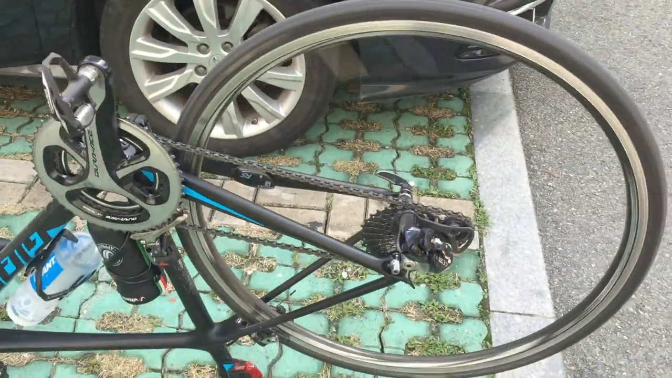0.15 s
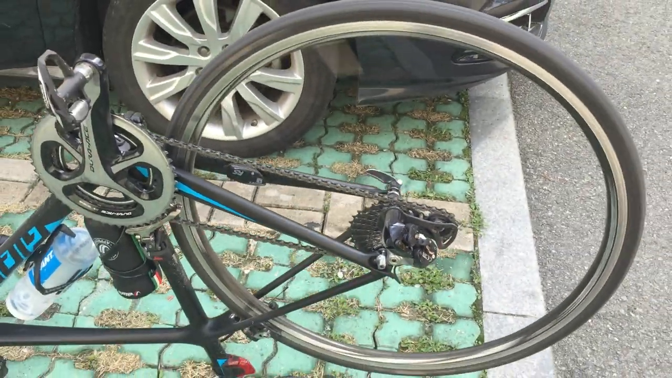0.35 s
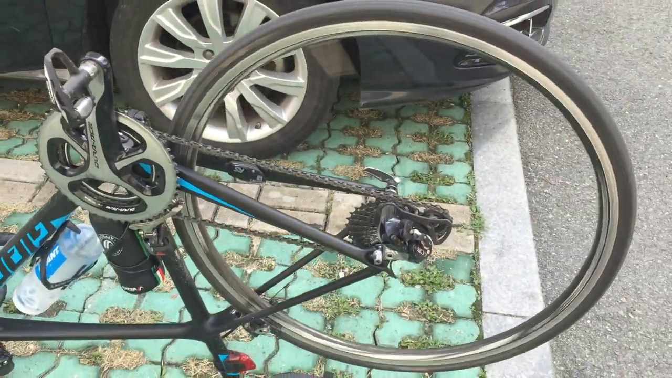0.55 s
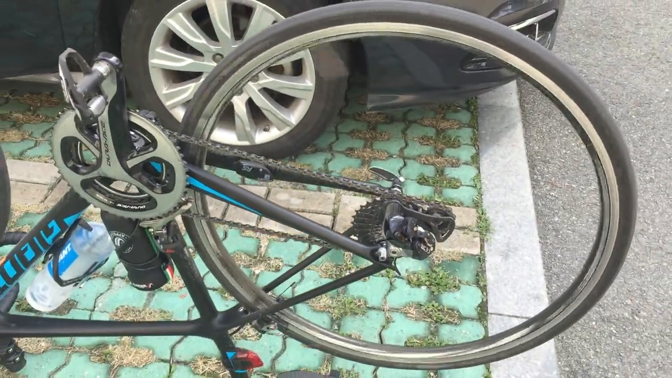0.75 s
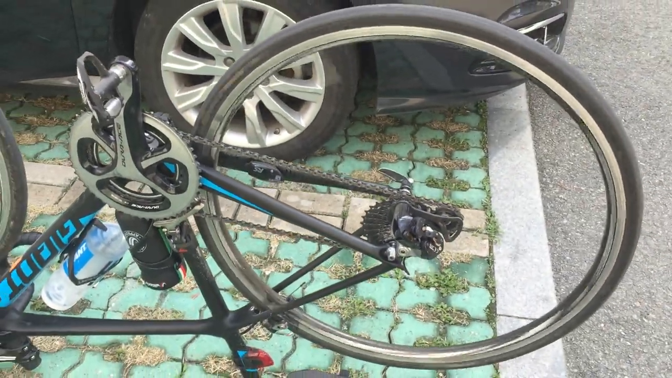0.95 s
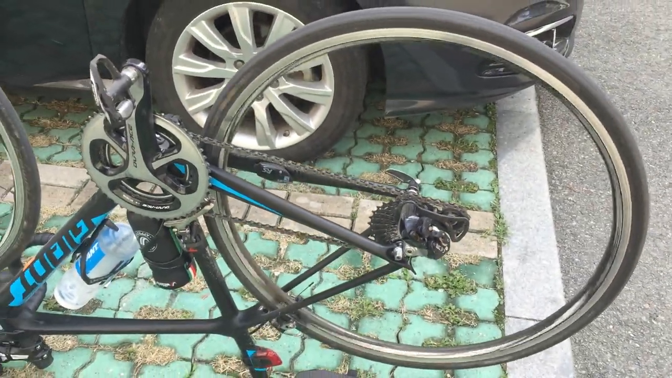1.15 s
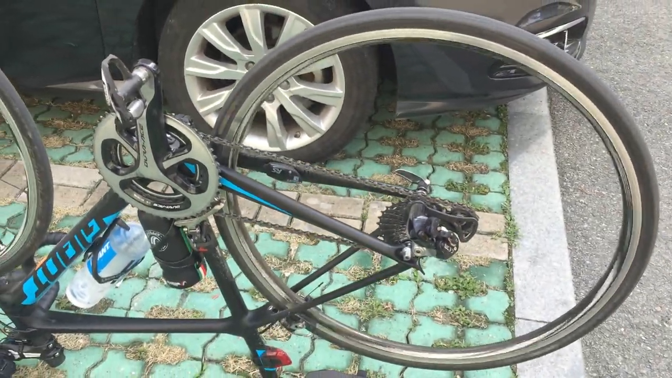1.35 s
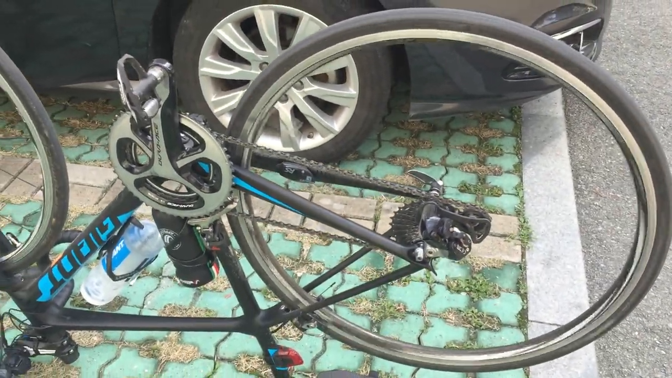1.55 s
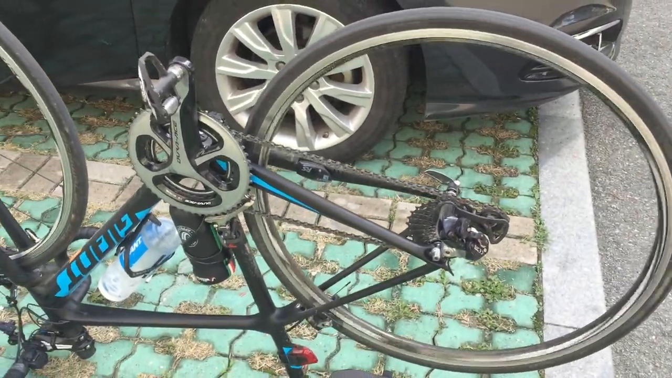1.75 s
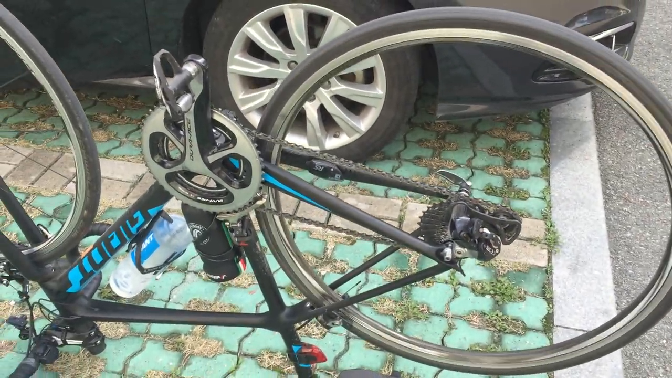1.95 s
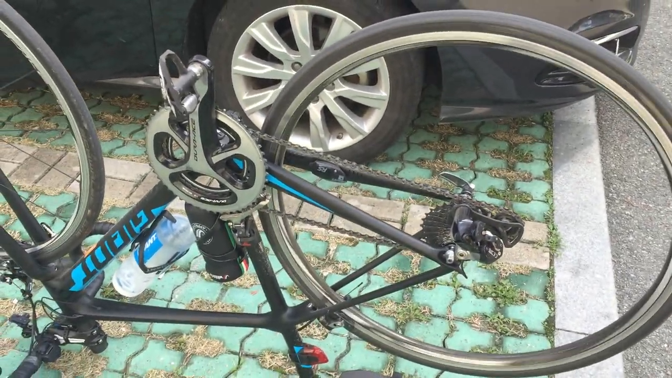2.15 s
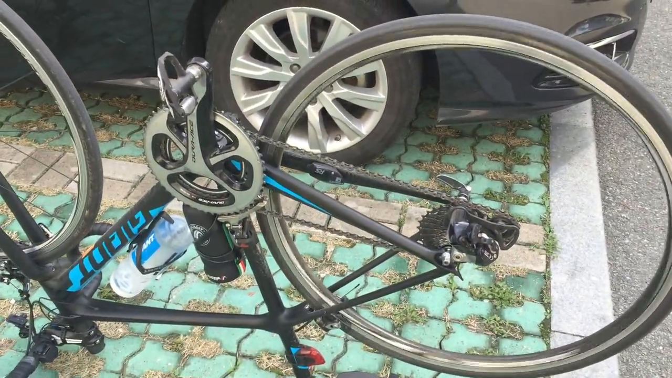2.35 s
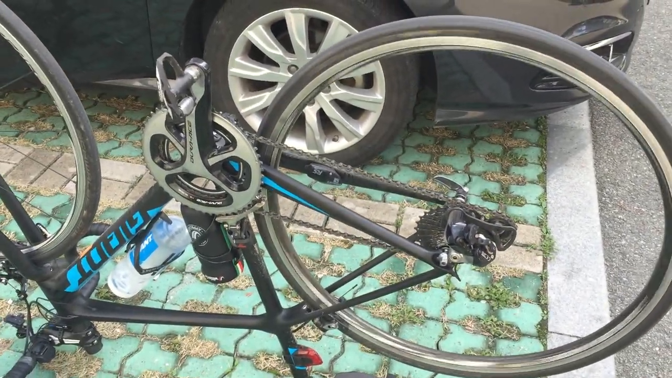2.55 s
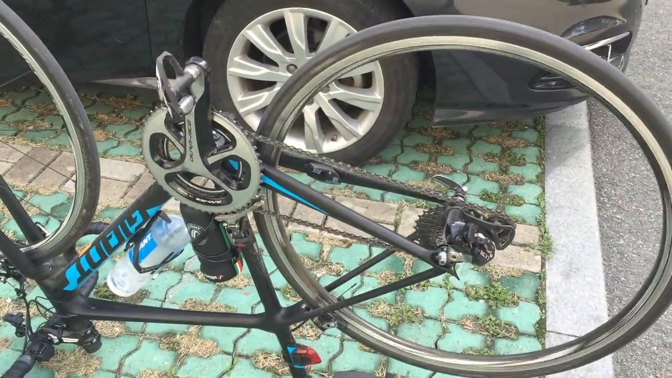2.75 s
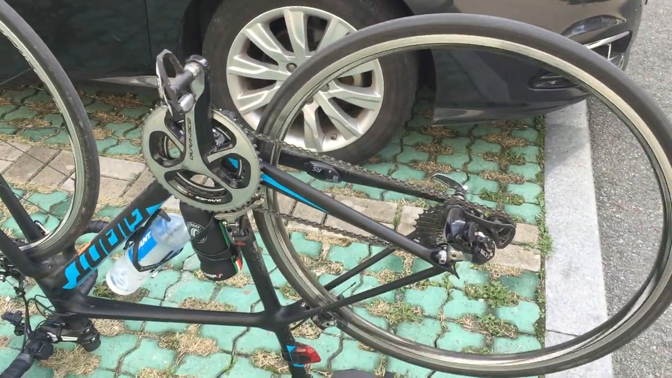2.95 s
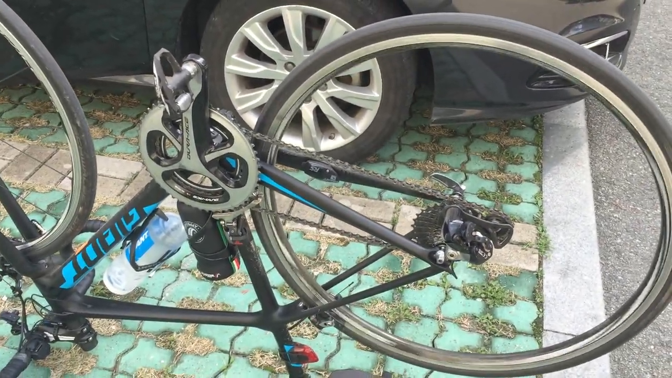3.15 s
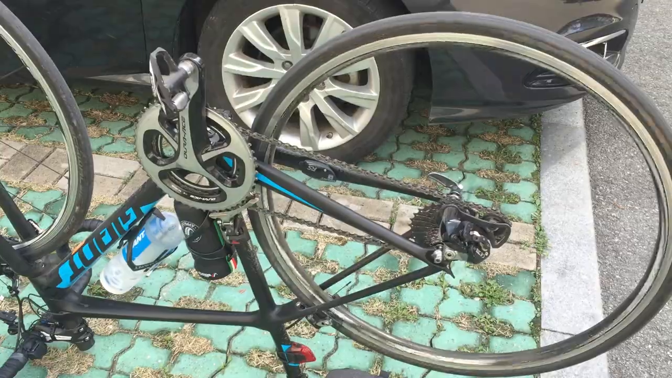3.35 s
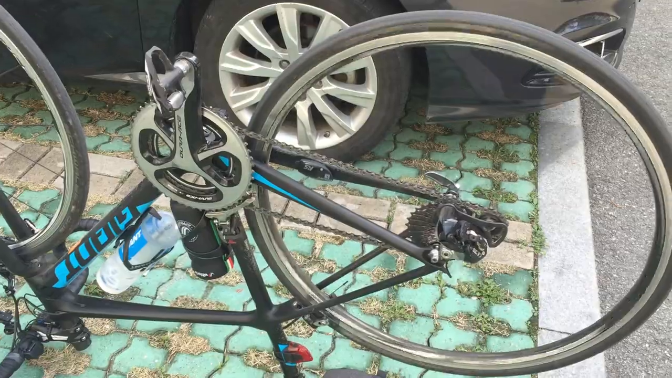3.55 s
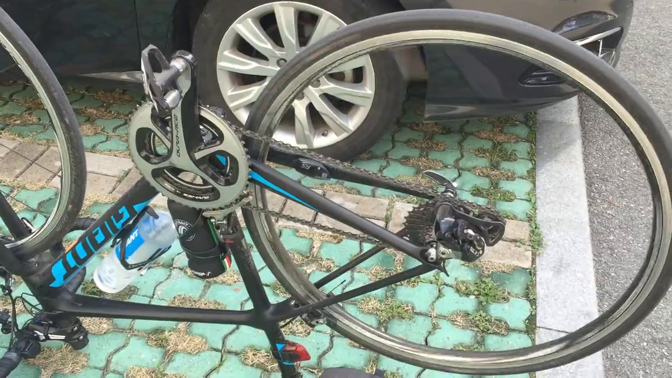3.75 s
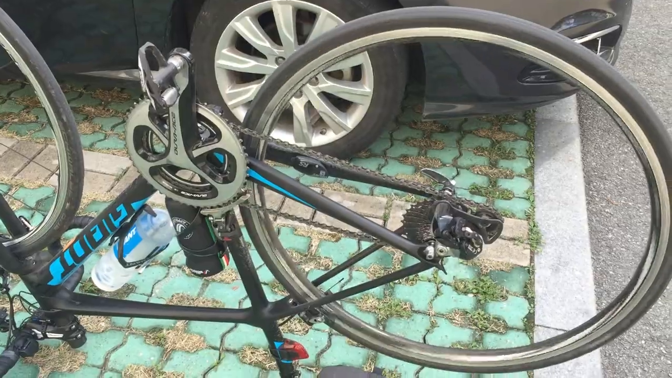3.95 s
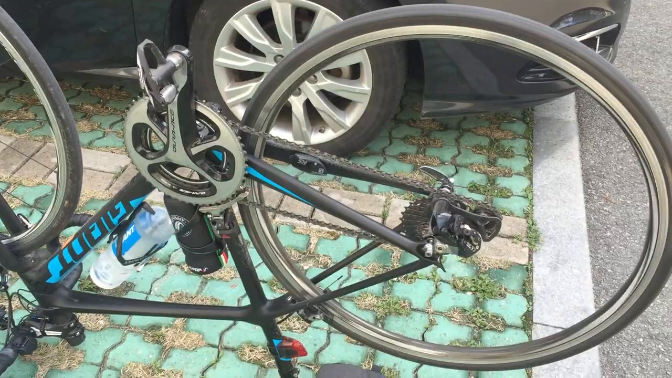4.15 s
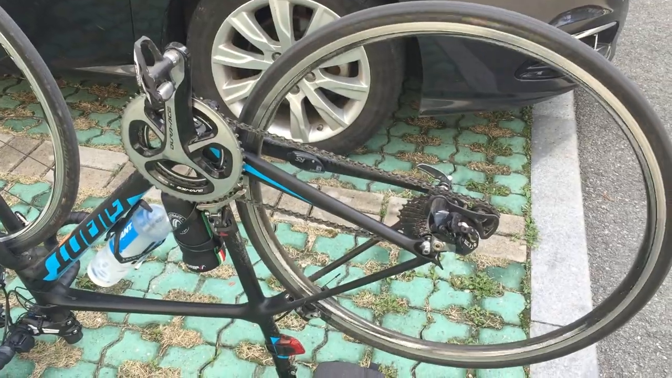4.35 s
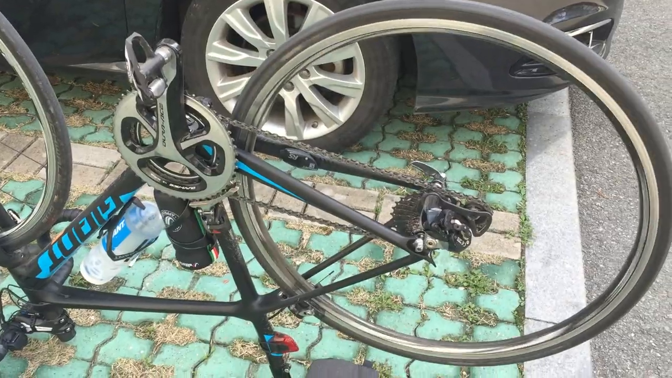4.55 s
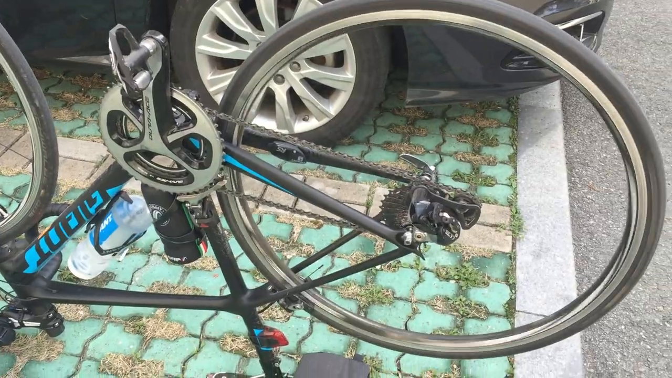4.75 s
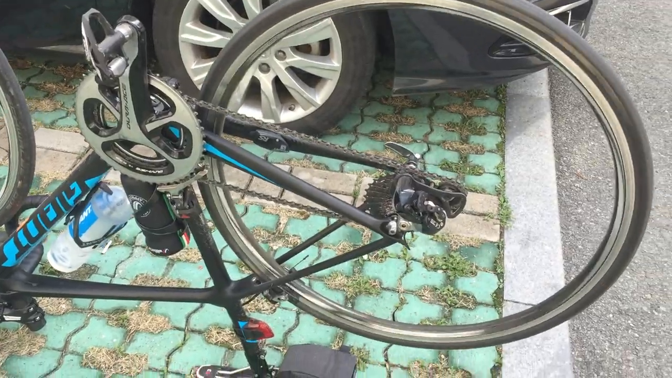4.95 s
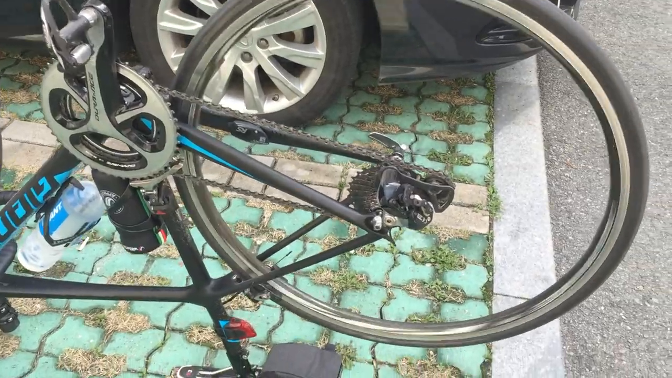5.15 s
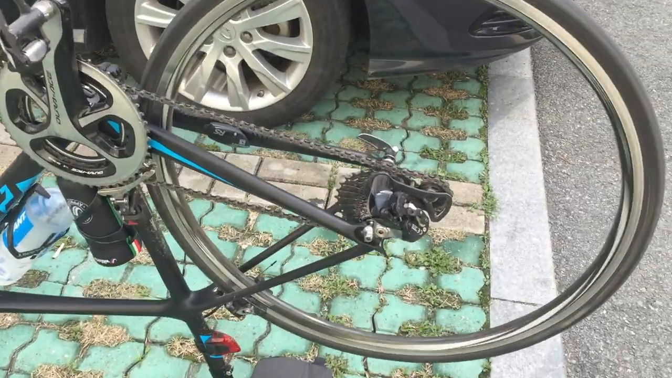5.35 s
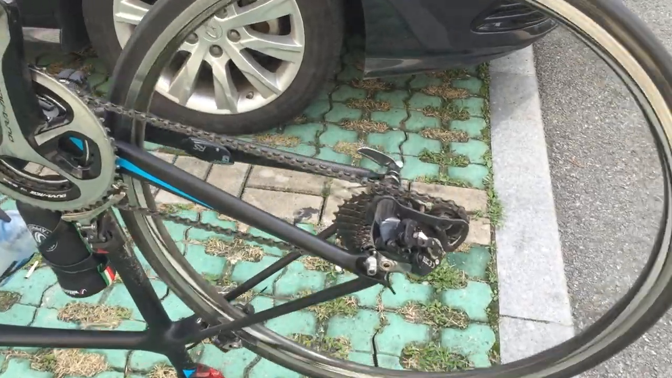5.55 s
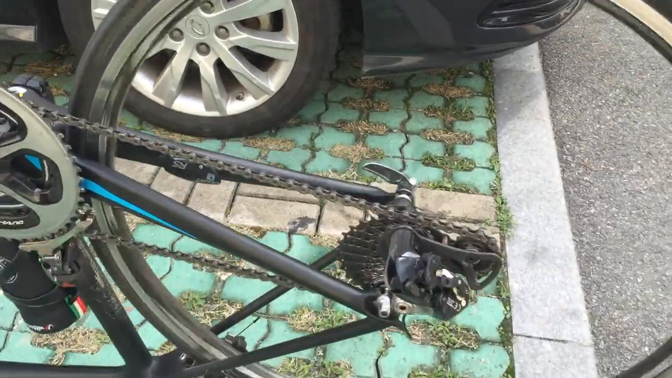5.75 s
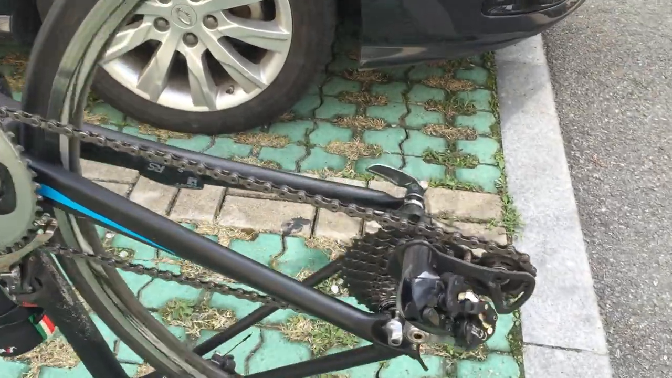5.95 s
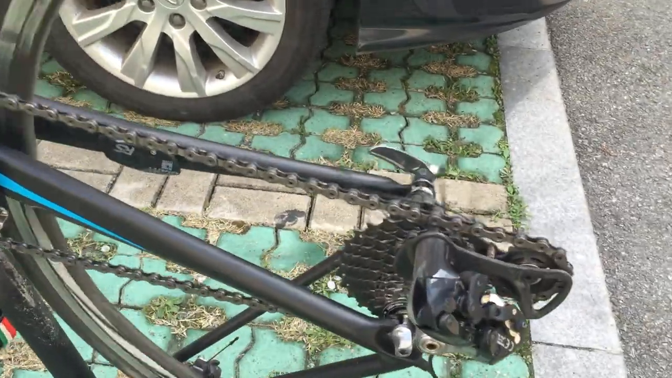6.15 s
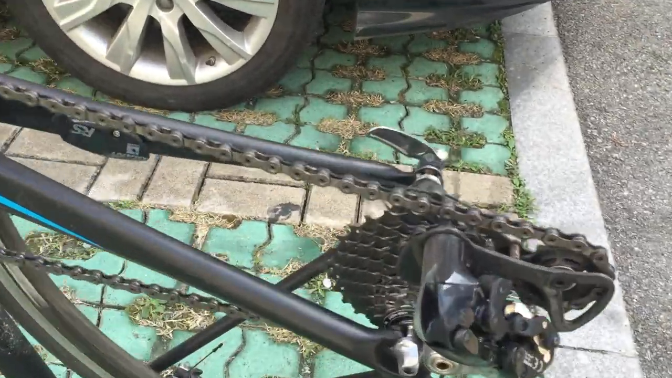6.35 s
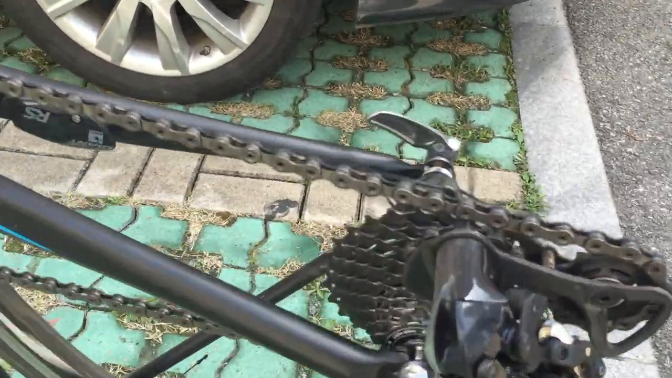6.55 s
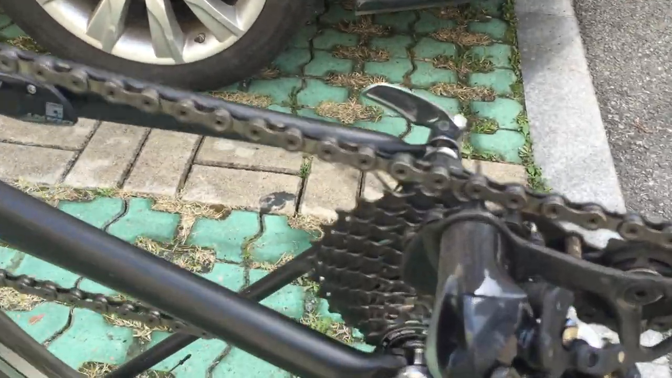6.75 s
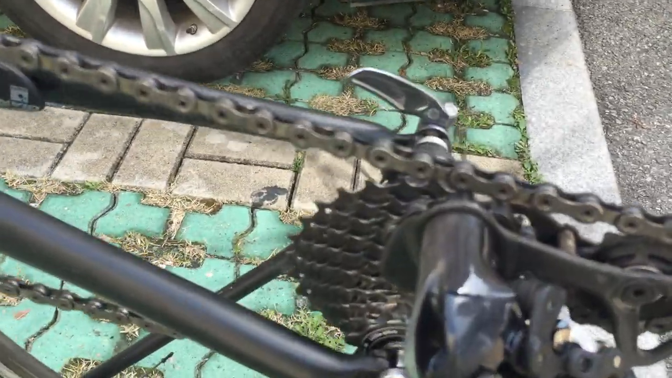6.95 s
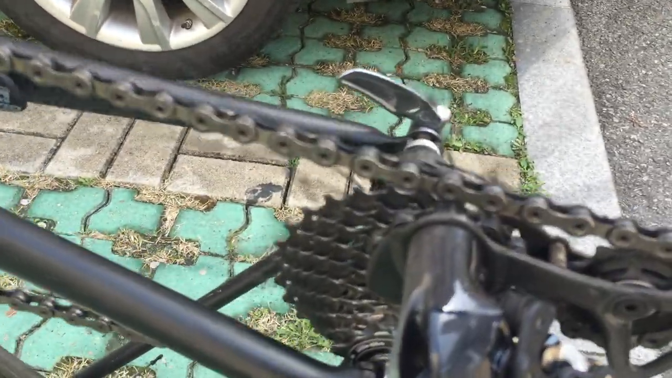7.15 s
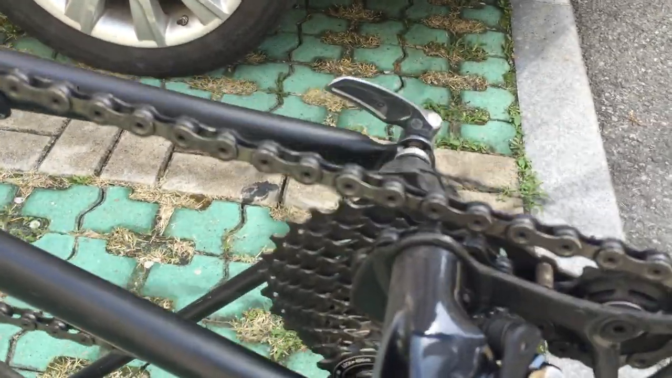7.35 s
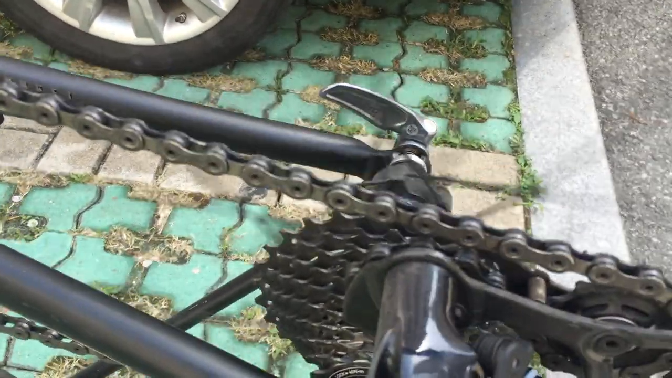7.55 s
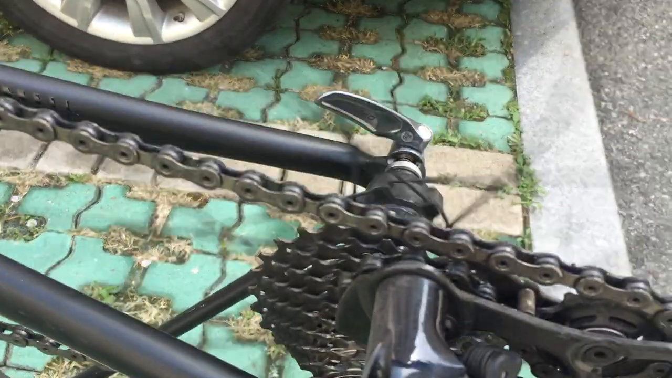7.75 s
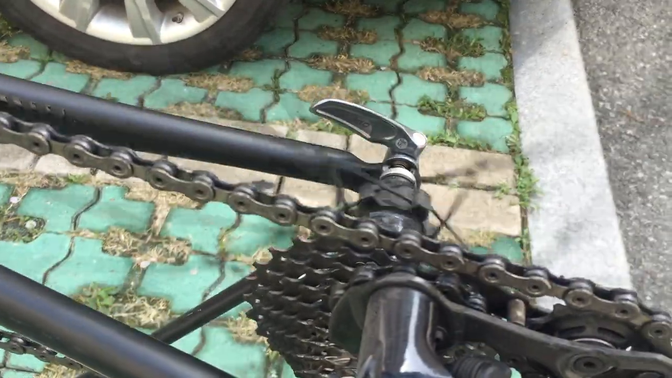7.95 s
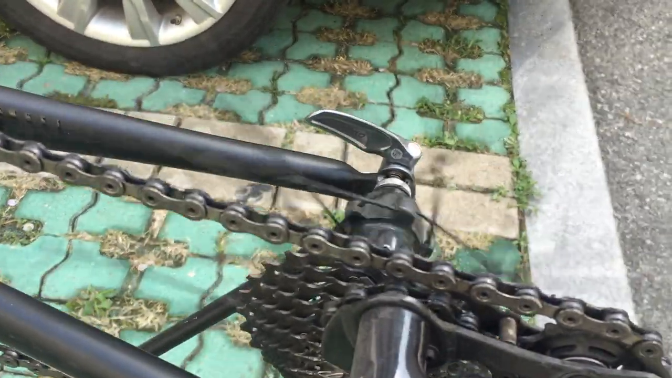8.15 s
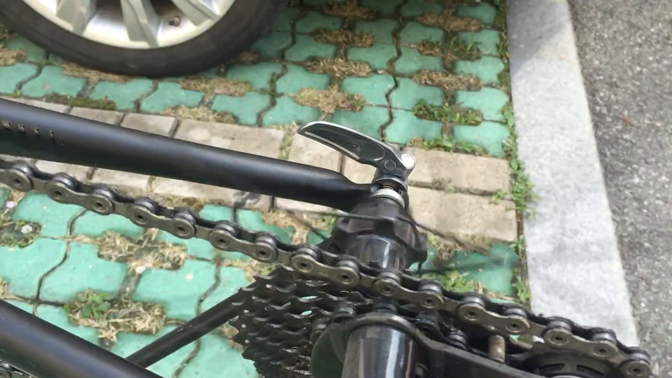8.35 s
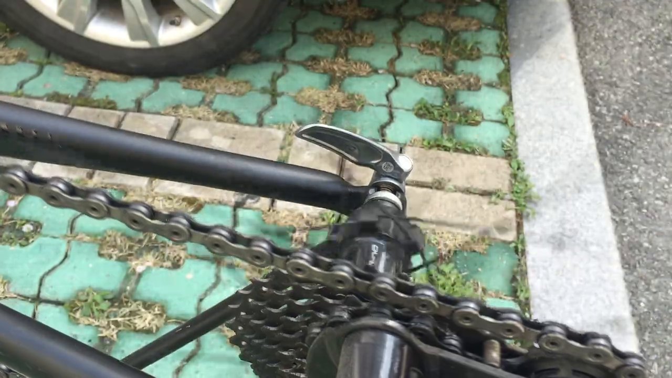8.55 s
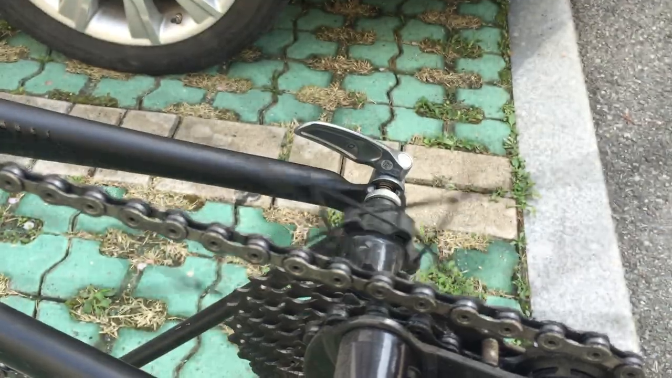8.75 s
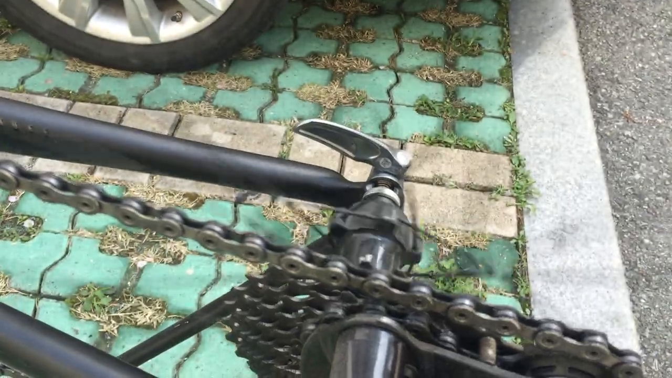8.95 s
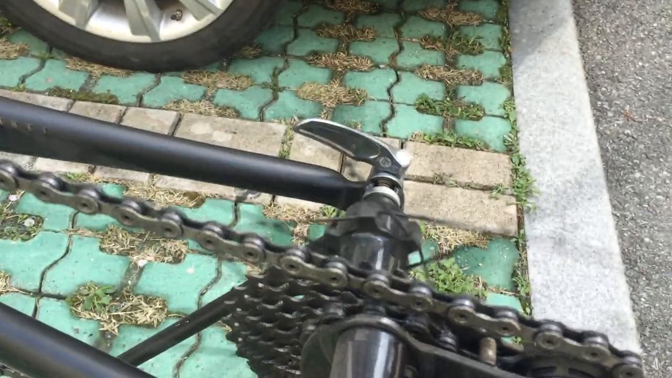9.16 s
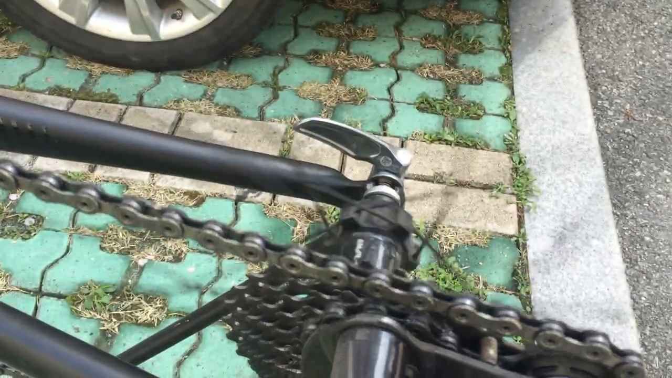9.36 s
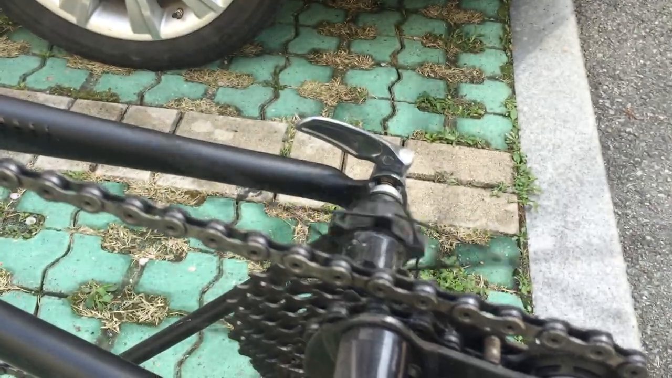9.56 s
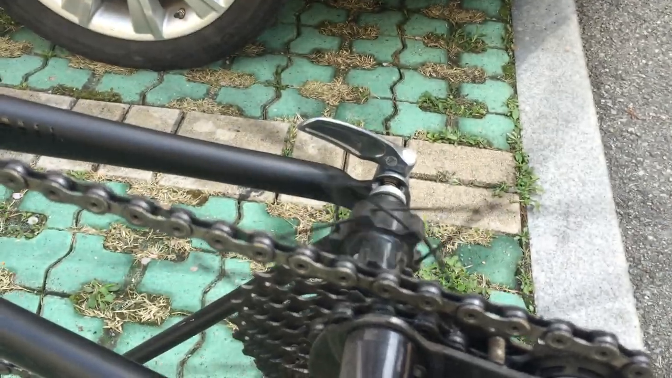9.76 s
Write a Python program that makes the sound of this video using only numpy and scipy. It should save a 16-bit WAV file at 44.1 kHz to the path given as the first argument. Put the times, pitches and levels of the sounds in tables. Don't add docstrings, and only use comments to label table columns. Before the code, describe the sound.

Fast, thin metallic ticking from a freewheeling bicycle hub, around ninety clicks a second and slowly dropping, with a faint hollow rim resonance pulsing as the wheel turns. Distant tyre hiss fades beneath. Around six seconds the hand-held microphone approaches, with rumbling wind bumps and handling knocks, and the ticks turn loud, dry and sharply bright until the end. Open outdoor parking area.

```python
import sys
import numpy as np
from scipy import signal
from scipy.fft import rfft, irfft, next_fast_len
from scipy.io import wavfile
from scipy.ndimage import uniform_filter1d, map_coordinates

SR = 44100
rng = np.random.default_rng(int(sys.argv[2]) if len(sys.argv) > 2 else 0)


def to_linear_factor(level_db):
    exponent = np.asarray(level_db, float) / 20
    return 10 ** exponent


def transcribe(u):
    v = np.clip(np.atleast_2d(u).T, -1, 1)
    q = np.round(v * 32767).astype(np.int16)
    wavfile.write(sys.argv[1], SR, q)


N = 436149
TEETH = 18


def unit(x):
    return x / np.sqrt(np.mean(x ** 2) + 1e-20)


def along(points, hz):
    f, v = np.transpose(points)
    return np.interp(np.log(hz + 1), np.log(f + 1), v)


def track(rows):
    s, value = np.transpose(rows)
    return np.interp(np.arange(N) / SR, s, value)


def wobble(knots_per_s):
    knots = rng.standard_normal(int(N * knots_per_s / SR) + 4)
    return map_coordinates(knots, [np.arange(N) * knots_per_s / SR])


def filtered(x, response):
    n = x.shape[-1]
    m = 2 * next_fast_len(n // 2 + 4096)
    spectrum = rfft(x, m) * response(np.fft.rfftfreq(m, 1 / SR))
    return unit(irfft(spectrum, m)[..., :n])


def colour(points):
    return lambda hz: to_linear_factor(along(points, hz))


def ringing(peaks):
    return lambda f: sum(to_linear_factor(db) ** 2 / (1 + (2 * (f - c) / w) ** 2) for c, w, db in peaks)


def causal(power):
    def response(hz):
        cepstrum = irfft(np.log(power(hz) + 1e-9) / 2)
        cepstrum[1:len(hz) - 1] *= 2
        cepstrum[len(hz):] = 0
        return np.exp(rfft(cepstrum))
    return response


def hollow(hz, centre_hz, width_hz):
    return 1 - .88 / (1 + (2 * (hz - centre_hz) / width_hz) ** 2)


# time in seconds, closeness 0-1.
CLOSENESS = [(0, 0.08), (5.2, 0), (6.0, 0.32), (6.8, 0.72), (9.89, 0.89)]


def closeness():
    return track(CLOSENESS)


# frequency in Hz, level in dB per Hz.
HISS_SPECTRUM = [(300, -42), (500, -24.5), (900, 2.5), (1300, 4.5), (1800, 1), (2700, 1), (5000, -3),
                 (15500, -47)]
# frequency in Hz, level in dB per Hz.
DRONE_SPECTRUM = [(150, -41), (240, -22), (310, -3.5), (390, -0.5), (470, -1), (700, -10)]


def street():
    t, near = np.arange(N) / SR, closeness()
    hiss_start_db, draws_away_s = -49.5, 5.2
    close_gain_db = 0.5
    distance_db = -20 * np.log10(1 + t / draws_away_s) ** 0.87
    hiss_db = hiss_start_db + distance_db + close_gain_db * near + wobble(3.02)
    air = rng.standard_normal((2, N))
    afar = filtered(air[0], lambda hz: colour(HISS_SPECTRUM)(hz) * hollow(hz, 2850, 450) ** .3)
    screened = filtered(air[1], lambda hz: colour(HISS_SPECTRUM)(hz) * hollow(hz, 1400, 600) ** .5)
    hiss = to_linear_factor(hiss_db) * (np.sqrt(1 - near) * afar + np.sqrt(near) * screened)

    drone_db, lorry_db, lorry_s, lorry_width_s = -59.5, -49.5, 8.03, 1.85
    lorry = to_linear_factor(lorry_db) / (1 + ((t - lorry_s) / lorry_width_s) ** 4)
    drone_level = (to_linear_factor(drone_db) + lorry) * to_linear_factor(1.9 * wobble(4) + 1.5 * wobble(1.25))
    return hiss + drone_level * filtered(rng.standard_normal(N), colour(DRONE_SPECTRUM))


# start in seconds, peak in dB, frequency in Hz.
EDDIES = [(0.453, -34, 69), (3.862, -35, 143), (4.169, -29, 70.0), (5.481, -34, 75.4), (5.604, -24, 129),
          (5.809, -20, 79.6), (6.139, -16, 122), (6.243, -11.5, 181.4), (6.259, -30, 188),
          (6.426, -28, 64.6), (6.962, -19, 103), (5.546, -25, 190), (6.884, -20, 90), (6.92, -20.5, 110),
          (7.041, -23.5, 90), (7.086, -19, 90), (8.833, -22.5, 162), (9.21, -30, 80.7), (9.4, -30, 72.7),
          (9.572, -37.5, 77.6)]


def eddies():
    out, t = np.zeros(N + SR), np.arange(SR // 10) / SR
    for s, db, hz in EDDIES:
        cycles = hz * t
        thump = np.sin(2 * np.pi * cycles) * cycles ** 2 * np.exp(-1.8 * cycles)
        out[round(s * SR):][:len(t)] += to_linear_factor(db + 7.5) * thump
    return out[:N]


# time in seconds, strength in dB.
BREEZE_DB = [(0, -57), (1.2, -53.5), (2, -55), (3, -52.5), (3.9, -58.5), (4.4, -62), (5, -55), (5.45, -54),
             (5.7, -47), (6.4, -45.5), (6.65, -61.5), (7, -45), (7.45, -61), (7.8, -57), (8.3, -62),
             (8.75, -50), (9, -58), (9.89, -59)]
# peak in seconds, peak in dB, seconds to fall 10 dB, sharper edge in dB.
GUST_EVENTS = [(.05, -50, 0.05, -10), (.47, -38.5, 0.0439, -20), (2.31, -50, 0.14, -3),
               (2.61, -46.5, 0.0828, -3.5), (2.95, -44, 0.02, -22), (3.1, -48, .1, -12),
               (3.3, -46.5, 0.0153, -10), (3.58, -49, .07, -4), (3.88, -50.5, 0.0932, -1),
               (4.19, -45.5, .06, -27.5), (5.15, -52, 0.2, -14), (5.34, -37.5, 0.02, -1.5),
               (5.5, -32, .07, -4), (5.65, -39, 0.07, -6), (5.81, -36, 0.03, -2.5), (6.16, -34.5, .05, 4),
               (6.26, -36.5, .04, 11), (6.35, -38, 0.0374, -11.5), (6.44, -34.5, 0.05, -12),
               (6.56, -49, .03, -12), (6.88, -36, 0.1, -8), (7.0, -40, 0.02, -1), (7.08, -35, 0.1, -12),
               (7.27, -42.5, 0.0853, -12), (8.55, -51, 0.21, -13), (8.84, -35.5, .035, -10),
               (9.23, -37, 0.0051, -20), (9.43, -39, .03, -12), (9.6, -43.5, 0.1, -5),
               (9.88, -36, 0.09, -4)]
# frequency in Hz, level in dB per Hz.
BUFFET_SPECTRUM = [(20, -51), (40, -1), (65, 3), (100, 1.5), (150, -13), (300, -36)]
# frequency in Hz, level in dB per Hz.
EDGE_SPECTRUM = [(80, -15), (140, -1), (190, -6), (280, -10), (450, -20.5), (800, -43.5)]


def wind():
    t = np.arange(N) / SR
    breeze_edge_db, breeze_swing_db = -6, 2.5
    rise_over_fall = 0.59
    steady_power = to_linear_factor(track(BREEZE_DB) + breeze_swing_db * wobble(9)) ** 2
    low_power = steady_power
    edge_power = to_linear_factor(breeze_edge_db) ** 2 * steady_power
    for s, db, fall_s, edge_db in GUST_EVENTS:
        away_s = np.maximum(t - s, (s - t) / rise_over_fall)
        gust_power = to_linear_factor(db - 10 * away_s / fall_s) ** 2
        low_power = low_power + gust_power
        edge_power = edge_power + gust_power * to_linear_factor(edge_db) ** 2
    lumps = wobble(35)
    edge_lumps_db = np.minimum(3.94 * lumps + 2.9 * wobble(60), 7)
    low = unit(to_linear_factor(2.03 * lumps) * filtered(rng.standard_normal(N), colour(BUFFET_SPECTRUM)))
    edge = unit(to_linear_factor(edge_lumps_db) * filtered(rng.standard_normal(N), colour(EDGE_SPECTRUM)))
    turbulence = to_linear_factor(-2.5) * np.sqrt(low_power) * low + to_linear_factor(-4) * np.sqrt(edge_power) * edge
    return turbulence + eddies()


# start in seconds, peak in dB, ring frequency in Hz.
CASE_TAPS = [
    (.1, -44, 400),
    (1.075, -42, 320),
    (2.2942, -34, 1250),
    (5.667, -25, 1150),
    (5.8167, -40, 1100),
    (6.3904, -33, 900),
]


def taps():
    out, t = np.zeros(N + SR), np.arange(SR // 20) / SR
    for s, db, hz in CASE_TAPS:
        cycles = hz * t
        ring = np.sin(2 * np.pi * cycles) * cycles * np.exp(-.9 * cycles)
        tick = .2 * np.sin(2 * np.pi * 2.4 * cycles) * np.exp(-1.8 * cycles)
        crack = .2 * to_linear_factor(-60 * t / 0.034) * uniform_filter1d(rng.standard_normal(len(t)), size=5)
        out[round(s * SR):][:len(t)] -= to_linear_factor(db + 6.5) * (ring + tick + crack)
    return out[:N]


# time in seconds, extra distance in m.
EXTRA_DISTANCE = [(4.414, 1.465), (6.481, 0)]


def angle(t):
    start_turns, turns_per_s = 1.044614, 5.082914
    slowing_per_s2, easing_per_s3 = .1828942, .0058764
    s = t - np.interp(t, *np.transpose(EXTRA_DISTANCE)) / 343
    return start_turns + turns_per_s * s - slowing_per_s2 * s ** 2 / 2 + easing_per_s3 * s ** 3 / 6


TEETH_HZ = np.geomspace(1500, 16000, 22)


def snaps(shape, teeth_db, common, fresh, scatter_db):
    clock = np.arange(-SR // 10, N + SR // 10) / SR
    tooth = np.arange(10, int(TEETH * angle(clock[-1])))
    start_s = np.interp(tooth / TEETH, angle(clock), clock)
    luck = rng.standard_normal((len(tooth), 2))
    starts = np.round((start_s + .00003 * luck[:, 0]) * SR).astype(int) + SR

    noise = rng.standard_normal((TEETH + 1, len(shape)))
    mixed = np.sqrt(common) * noise[0] + np.sqrt(1 - common) * noise[1:]
    spectra = rfft(mixed * shape)
    spectra /= np.sqrt(uniform_filter1d(abs(spectra) ** 2, size=44, axis=1))
    hz = np.fft.rfftfreq(len(shape), 1 / SR)
    strength = to_linear_factor(1.5 * np.array([np.interp(hz, TEETH_HZ, row) for row in teeth_db]))
    own = unit(irfft(spectra * strength, len(shape)))[tooth % TEETH]
    new = unit(rng.standard_normal(own.shape) * shape)
    bursts = (np.sqrt(1 - fresh) * own + np.sqrt(fresh) * new) * to_linear_factor(scatter_db * luck[:, 1:])

    where = starts[:, None] + np.arange(len(shape))
    return np.bincount(where.ravel(), bursts.ravel(), N + 3 * SR)[SR:SR + N]


# time in seconds, level in dB.
RIM_FACING = [(0, -51), (1.2, -50), (2.2, -50.5), (2.7, -54), (5.2, -53), (6.8, -50.5), (7.7, -52),
              (8.2, -53), (8.45, -49.5), (8.9, -50.5), (9.1, -52), (9.89, -53.5)]
# frequency in Hz, width in Hz, level in dB.
CAVITY_MODES = [(577.6, 41.5, 1), (646, 44, -1)]
# frequency in Hz, width in Hz, level in dB.
HOOP_MODES = [(793.5, 102, -5.5), (941, 28, -1.5), (1042, 9.7, -7.5)]


def rim():
    even_teeth = np.zeros((TEETH, len(TEETH_HZ)))
    shake = snaps(np.hanning(1320), even_teeth, common=.2, fresh=.6, scatter_db=1)
    t, facing_db = np.arange(N) / SR, track(RIM_FACING)
    cavity_fade_db_per_s, hoop_fade_db_per_s = 0.49, 0.01
    turn = 2 * np.pi * angle(t)
    sweep = np.cos(2 * turn + .7) + .3 * np.cos(turn + .35)
    depth_db = 4.4 - .25 * t
    cavity = filtered(shake, causal(lambda hz: ringing(CAVITY_MODES)(hz) ** 1.58))
    cavity = unit(to_linear_factor(depth_db * sweep) * cavity)
    sway_db = .7 * sweep + wobble(5)
    hoop = filtered(shake, causal(lambda hz: ringing(HOOP_MODES)(hz) ** 1.39))
    hoop = unit(to_linear_factor(sway_db) * hoop)
    cavity_db = facing_db - cavity_fade_db_per_s * t + 0.13
    hoop_db = facing_db - hoop_fade_db_per_s * t + 0.25
    return to_linear_factor(cavity_db) * cavity + to_linear_factor(hoop_db) * hoop


# frequency in Hz, share of the lobes.
LOBE_SHARES = [(1900, .3), (2300, .9), (4000, .5), (7000, .5), (12000, .1)]


def wear(lobes, accents):
    chance_db, accent_width, accent_gain = .6, .17, .7
    side = 2 * np.pi * np.arange(TEETH) / TEETH
    round_db = sum(db * np.cos(count * side + phase) for count, db, phase in lobes)
    teeth_db = np.outer(round_db, along(LOBE_SHARES, TEETH_HZ))
    teeth_db += chance_db * rng.standard_normal(teeth_db.shape)
    for tooth, hz, db in accents:
        nearness = np.exp(-(np.log(TEETH_HZ / hz) / accent_width) ** 2)
        teeth_db[tooth] += accent_gain * db * nearness
    return teeth_db


def chatter(teeth_db, quick_s, rattle_db, rattle_s, late_s=0):
    t = np.clip(np.arange(1100) / SR - .0001 - late_s, 0, None)
    onset = 1 - np.exp(-(t / .00016) ** 2)
    decay = to_linear_factor(-60 * t / quick_s) + to_linear_factor(rattle_db - 60 * t / rattle_s)
    return snaps(onset * decay, teeth_db, common=.2, fresh=.13, scatter_db=.4)


# time in seconds, level in dB.
HUB_LEVEL = [(0, -41.5), (.6, -41.5), (2.5, -41), (4.8, -40.5), (5.3, -40), (5.8, -37.5), (6.3, -36),
             (6.7, -33), (7.2, -32.5), (8, -33), (8.8, -33), (9.89, -33)]
# lobes a turn, depth in dB, phase in radians.
FAR_RUNOUT = [(1, .4, 0), (2, .7, -.4), (3, .8, -.6)]
NEAR_RUNOUT = [(1, .6, -.2), (2, .4, -2.4), (3, .9, -1.2)]
# tooth, frequency in Hz, level in dB.
FAR_TOOTH_NOTES = [(0, 3900, 4), (1, 3800, 6), (2, 8000, 3), (4, 3600, -5), (4, 5100, -3), (4, 6400, 4),
                   (6, 6400, -5), (7, 6400, -4), (10, 5100, -5), (11, 4100, -6), (11, 5700, -4),
                   (13, 5500, 3), (14, 2900, -5), (17, 4500, 2), (8, 4300, 4), (7, 4300, 2)]
NEAR_TOOTH_NOTES = [(0, 3400, 5), (1, 6800, 4), (2, 2400, 4), (2, 4500, -4), (4, 3400, -6), (5, 4500, 8),
                    (5, 12000, -3), (10, 2700, -5), (11, 4000, -4), (11, 6000, -7), (12, 3000, 4),
                    (12, 11000, 3), (12, 14500, 4), (1, 12000, 3), (13, 5700, 5), (14, 5700, 3),
                    (15, 8500, 4), (16, 2900, 5), (16, 4500, 6)]
# frequency in Hz, level in dB.
FAR_SNAP_SPECTRUM = [(900, -54), (1500, -7.5), (2900, -4.5), (3500, -5), (4400, -10), (5700, -7.5),
                     (7000, 0), (8200, -5), (9700, 0), (10550, -3), (11300, -2), (14300, -3), (15600, 1)]
NEAR_SNAP_SPECTRUM = [(900, -40), (1400, -61), (2000, -6.5), (3100, -11.5), (4400, -6.5), (5200, -11),
                      (5750, -13), (6200, -3.5), (7300, -6.5), (8800, -3), (9700, -2), (10400, -1),
                      (13800, 5), (15700, -1)]
# frequency in Hz, width in Hz, level in dB.
FAR_MODES = [(1835, 40, -3), (2420, 110, -7), (3450, 250, -11), (4330, 420, -6), (5510, 130, -12),
             (6540, 63, -8), (6820, 90, 0), (7400, 150, -4), (8370, 120, -10), (9550, 120, -4),
             (10020, 70, -3), (11000, 70, -7), (11450, 90, -5), (12510, 120, -3), (12980, 55, -1),
             (13800, 100, -3), (14450, 220, 1), (15430, 120, -2), (15720, 150, -4)]
NEAR_MODES = [(1240, 30, -17), (1820, 70, -11), (2095, 45, -10), (3020, 200, -7), (4420, 350, -10),
              (5700, 250, -7), (6800, 200, -10), (7400, 250, -8), (8155, 48, -7), (9240, 45, -7),
              (9600, 170, -5), (11460, 140, -3), (12515, 90, -2), (13140, 55, -3), (13860, 150, -1),
              (14230, 150, 1), (14810, 55, -2), (15450, 150, -1), (15720, 200, -1)]
MIDWAY_MODES = [(1350, 250, -13), (2120, 50, -5), (3350, 200, -9), (3800, 200, -10), (6500, 120, -2),
                (7300, 90, 0), (7750, 150, -6)]


def hub():
    far_teeth = wear(FAR_RUNOUT, FAR_TOOTH_NOTES)
    paving = chatter(far_teeth, .015, rattle_db=-12, rattle_s=.06, late_s=.003)
    far_blow = chatter(far_teeth, .014, rattle_db=-13, rattle_s=.06) + to_linear_factor(-6) * paving
    near_teeth = wear(NEAR_RUNOUT, NEAR_TOOTH_NOTES)
    near_blow = chatter(near_teeth, .013, rattle_db=-16, rattle_s=.065)

    def far_power(hz):
        metal = colour(FAR_SNAP_SPECTRUM)(hz) ** 2 + to_linear_factor(20.5) * ringing(FAR_MODES)(hz) ** 1.13
        return metal * hollow(hz, 2850, 450)

    def near_power(hz):
        metal = colour(NEAR_SNAP_SPECTRUM)(hz) ** 2 + to_linear_factor(20.0) * ringing(NEAR_MODES)(hz) ** 1.26
        return metal * hollow(hz, 1450, 600)

    far = filtered(far_blow, causal(far_power))
    close = filtered(near_blow, causal(near_power))
    midway = filtered(near_blow, causal(lambda hz: ringing(MIDWAY_MODES)(hz) ** 1.3))
    near = closeness()
    midway_s, midway_width_s, midway_db = 5.8, .8, -10
    passing = to_linear_factor(midway_db) * np.exp(-((np.arange(N) / SR - midway_s) / midway_width_s) ** 2)
    return to_linear_factor(track(HUB_LEVEL)) * (np.sqrt(1 - near) * far + np.sqrt(near) * close + passing * midway)


def scene():
    return (street() + wind() + taps() + rim() + hub())[None]


def roll_off(x):
    return signal.sosfilt(signal.butter(12, 15830, fs=SR, output="sos"), x)


def record(dry):
    top_hz = 15830
    banded = filtered(dry, lambda hz: hz < top_hz) * np.std(dry)
    return roll_off(banded)


dry = scene()
out = record(dry)
transcribe(out)
```